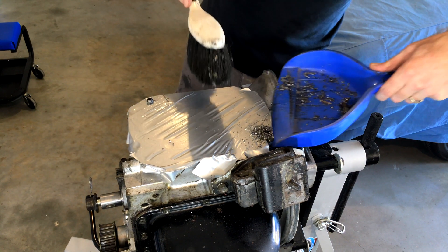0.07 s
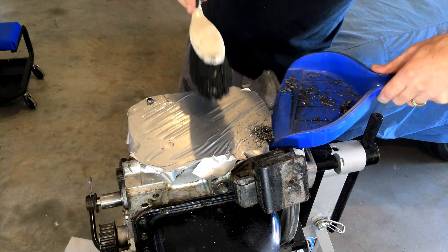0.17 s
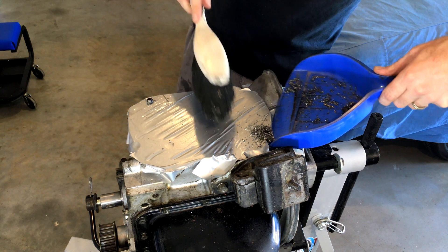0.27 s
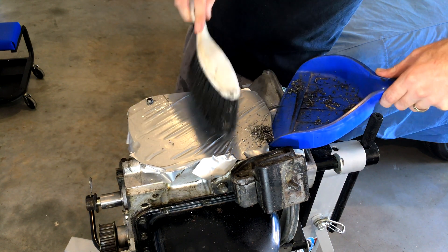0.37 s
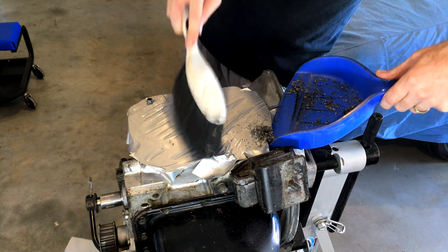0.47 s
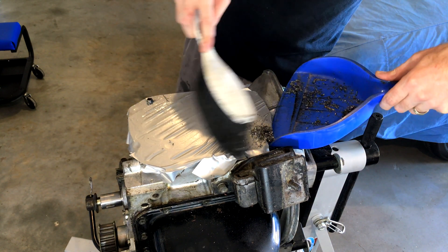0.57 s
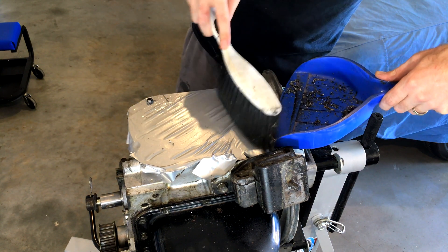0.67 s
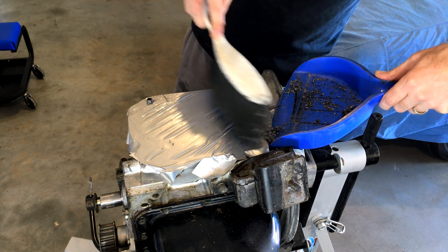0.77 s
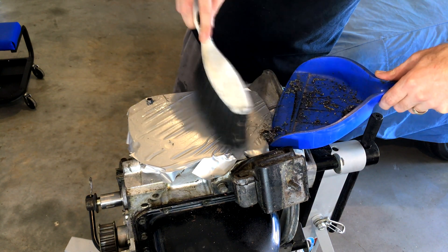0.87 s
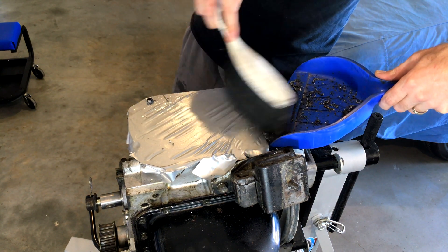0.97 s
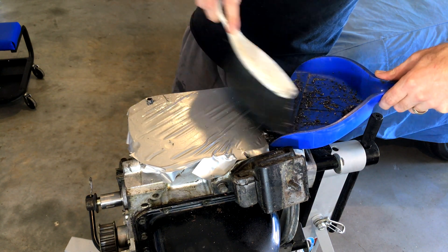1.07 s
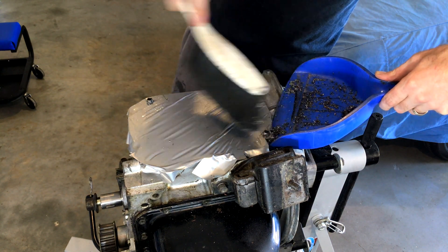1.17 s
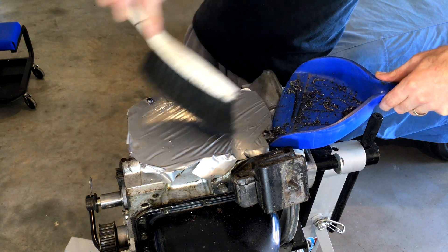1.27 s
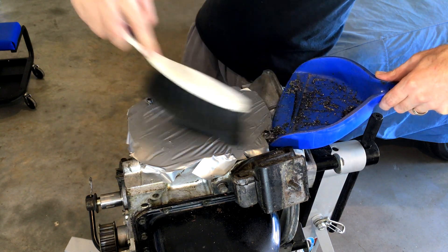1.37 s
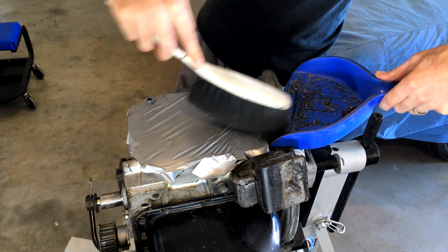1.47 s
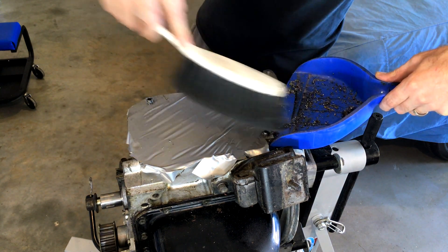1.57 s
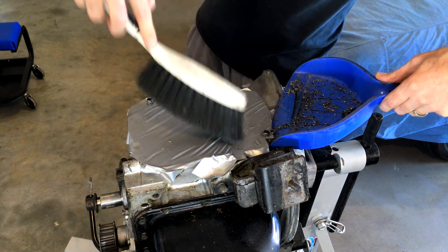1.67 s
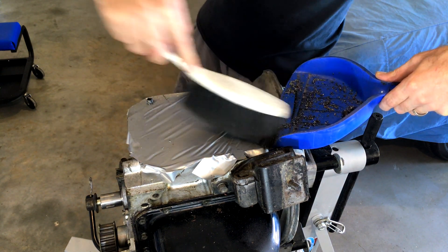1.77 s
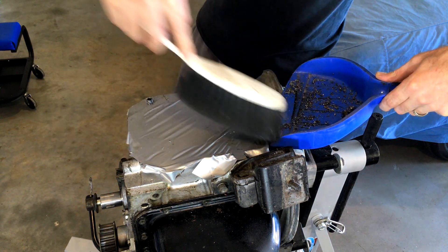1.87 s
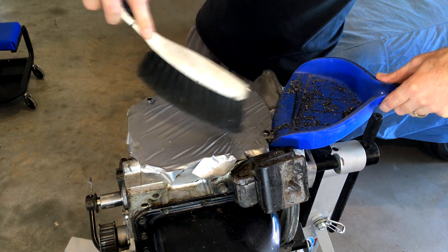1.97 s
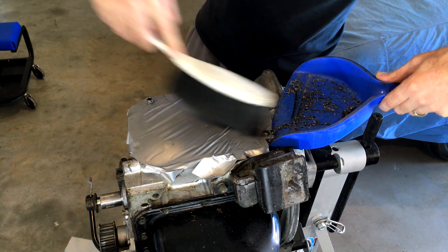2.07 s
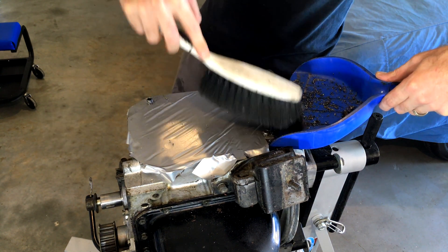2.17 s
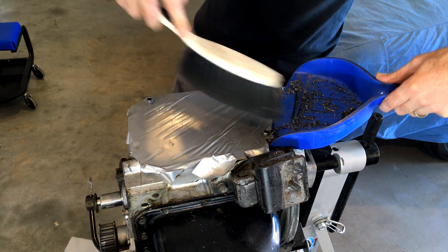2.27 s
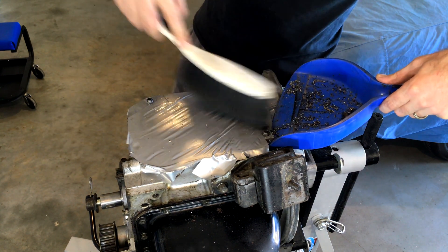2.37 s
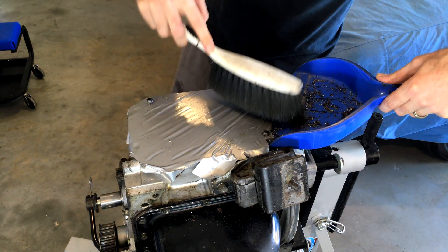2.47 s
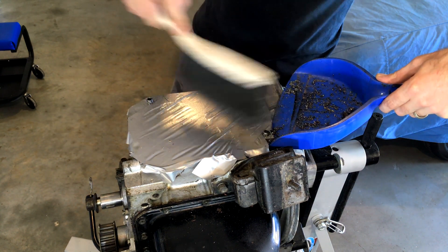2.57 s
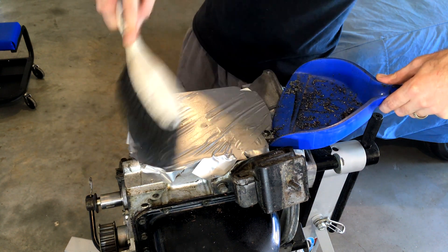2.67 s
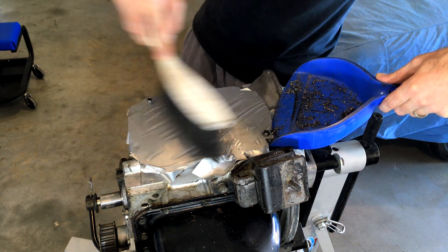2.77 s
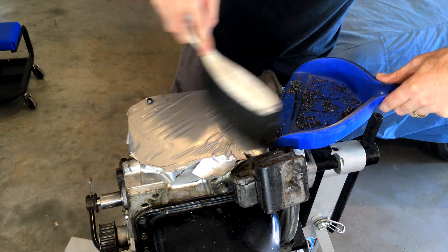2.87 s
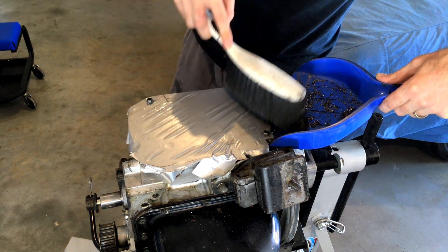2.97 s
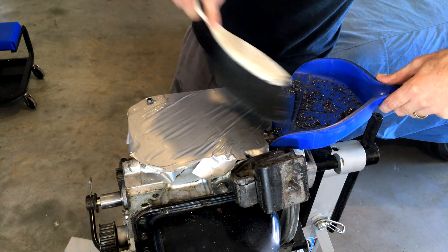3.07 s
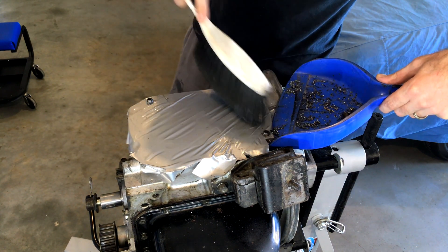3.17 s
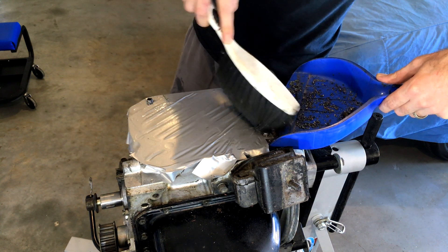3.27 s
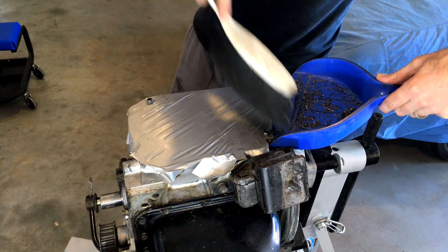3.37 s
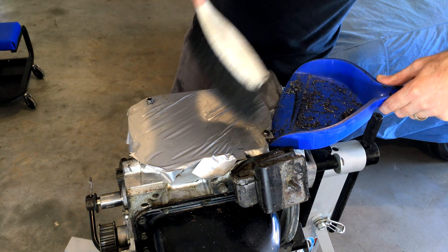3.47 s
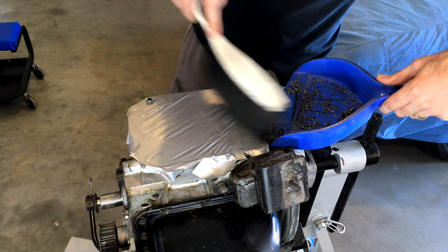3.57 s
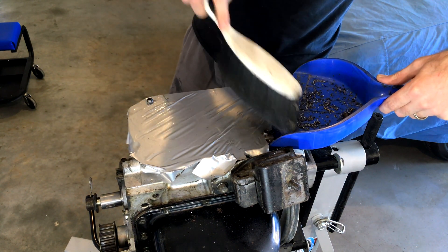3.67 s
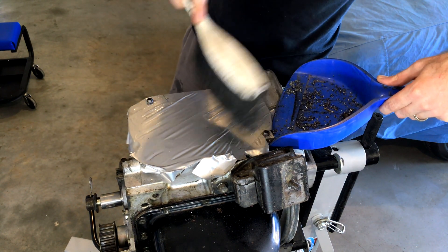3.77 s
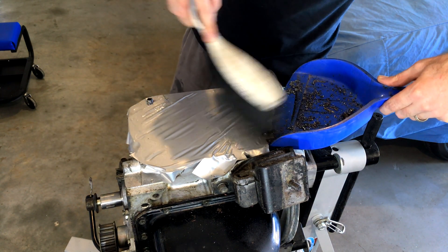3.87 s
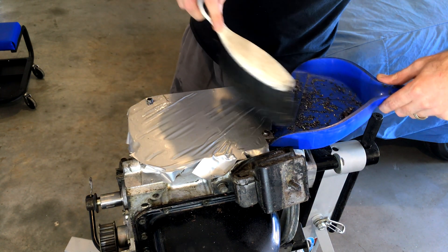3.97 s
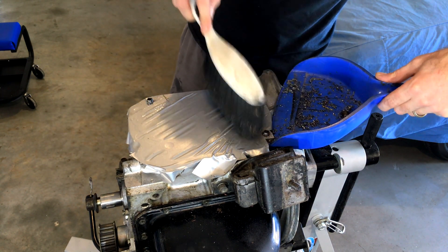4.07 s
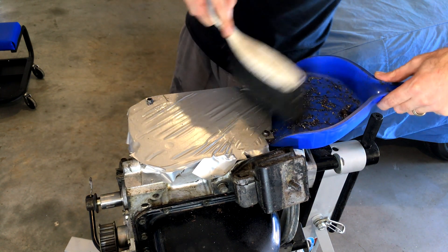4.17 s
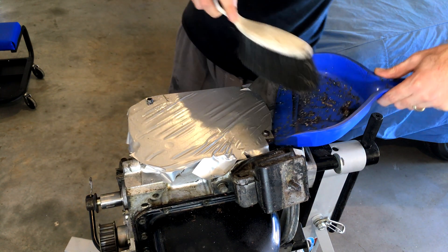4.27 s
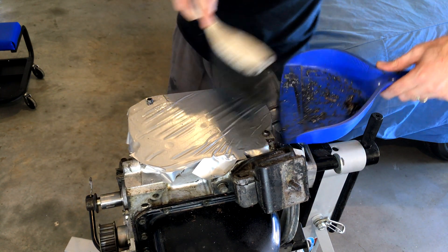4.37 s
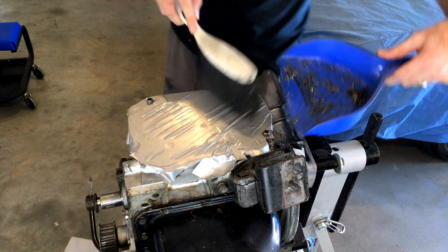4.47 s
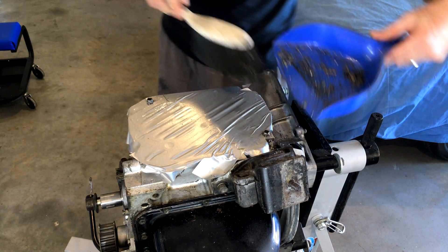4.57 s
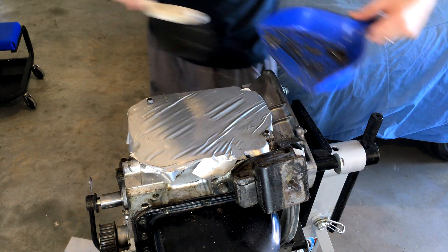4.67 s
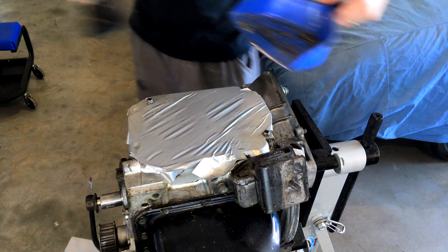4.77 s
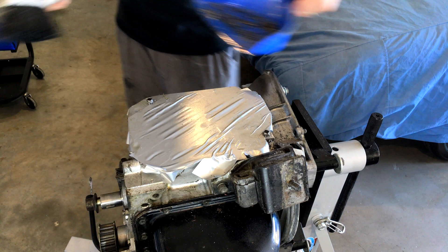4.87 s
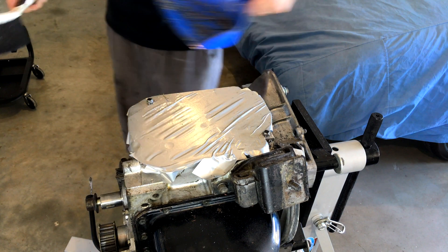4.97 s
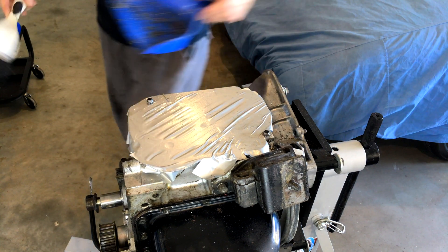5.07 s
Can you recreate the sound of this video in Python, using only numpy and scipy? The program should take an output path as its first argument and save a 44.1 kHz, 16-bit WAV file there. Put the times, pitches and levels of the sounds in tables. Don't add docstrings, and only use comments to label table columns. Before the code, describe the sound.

In a quiet garage, close to the microphone, a stiff hand brush makes about a dozen short strokes over a tape-covered engine part. Each lands with a small drum-like thump, then a dry, crackly scratch lasting a fraction of a second. Metal shavings tick sharply into a plastic dustpan, which rattles lightly. Strokes come roughly three per second, then thin out to faint brushing and a few last ticks.

```python
import sys
import numpy as np
from scipy import signal
from scipy.fft import rfft, irfft, next_fast_len
from scipy.io import wavfile
from scipy.ndimage import uniform_filter1d

SR = 44100
rng = np.random.default_rng(int(sys.argv[2]) if len(sys.argv) > 2 else 0)


def inscribe(sig):
    pcm = np.round(np.clip(np.atleast_2d(sig).T, -1, 1) * 32767)
    wavfile.write(sys.argv[1], SR, pcm.astype(np.int16))


def how_loud(loudness_db):
    steps = np.asarray(loudness_db, float) / 20
    return 10 ** steps


N = 226268

# freq_hz, density_db_per_hz
GARAGE_SPECTRUM = [(12, -8), (20, 7), (58, 3.5), (210, -6), (388, -11.5), (472, -8), (678, -16),
                   (780, -8.5), (976, -16.5), (1570, -16), (2530, -21.5), (5080, -22.5), (7110, -22.5),
                   (14700, -26.5), (16000, -25)]
# start_s, build_s, hold_s, level_db, ease_db_per_s
SHUFFLES = [
    (0, 0.0057, 0.1, -46.5, 103),
    (.488, 0.01, 0.08, -57, 91.5),
    (.88, .02, .02, -62, 86),
    (1.33, 0.029, 0.03, -62, 150),
    (1.75, 0.032, 0.021, -68, 200),
    (2.05, 0.071, 0.027, -68, 88),
    (2.37, 0.064, 0.023, -66, 71),
    (3.82, .02, 0.096, -65.5, 41),
    (4.19, 0.01, 0.013, -73, 200),
    (4.44, 0.016, .005, -61, 295),
]
# start_s, peak_db, pitch_hz
BUMPS = [
    (0.101, -41.5, 153),
    (0.575, -51, 145),
    (3.985, -45.5, 104),
    (4.023, -47, 95),
    (4.205, -51.5, 139),
    (4.456, -42.5, 127),
]
# start_s, build_s, hold_s, level_db, ease_db_per_s
WOBBLES = [
    (4.56, 0.058, 0.11, -69, 200),
    (4.95, 0.027, 0.089, -69, 200),
    (.24, 0.055, 0.1, -64.5, 250),
    (1.8, 0.019, 0.029, -59.5, 250),
    (2.19, 0.014, 0.013, -61, 300),
    (2.43, 0.014, 0.016, -61, 250),
    (3.62, 0.026, 0.029, -64.5, 200),
]
# start_s, build_s, hold_s, level_db, ease_db_per_s
SWISHES = [
    (0, 0.03, .01, -67, 26),
    (1.24, 0.062, .012, -73, 900),
    (4.52, 0.022, .05, -76.5, 18),
]
# start_s, build_s, hold_s, level_db, ease_db_per_s
TRICKLES = [
    (.75, .01, 0.092, -56, 150),
    (1.03, 0.023, .1, -63, 146),
    (1.52, .02, .1, -66.5, 150),
    (2.2, .01, 0.091, -61.5, 150),
    (2.53, .01, 0.077, -61, 200),
    (3.3, .02, 0.11, -61, 200),
    (3.66, .01, 0.053, -79, 148),
    (4.19, .01, 0.017, -71, 300),
    (4.7, .03, 0.38, -76, 100),
]
# start_s, peak_db, pitch_hz, low_part_db
CURLS = [(0.75, -31.5, 4600, -4), (0.795, -36.5, 4070, -1), (0.8171, -38, 4180, -2),
         (0.864, -34.5, 5130, -15), (0.995, -31.5, 3700, -12), (1.034, -43, 4910, -10),
         (1.2799, -48.5, 5150, 4), (1.575, -44, 4210, -8), (2.2599, -44, 3180, 1), (2.538, -46, 5000, 6),
         (3.3894, -48, 5000, -2), (3.406, -40, 4680, -7), (3.4494, -46, 3800, 5.5), (3.464, -53, 5530, 6),
         (3.9489, -28.5, 3900, -1), (3.9777, -30.5, 4800, -3), (4.0323, -47, 5260, 0)]
# start_s, peak_db, pitch_hz, low_part_db
CHIPS = [(1.1272, -46.5, 4160, 0), (1.402, -37, 3320, -16), (1.614, -46, 3230, -2),
         (2.1227, -27.5, 3880, -27), (2.2054, -39.5, 3680, -2), (2.461, -36.5, 3830, -10),
         (2.497, -46, 3850, -23), (2.556, -44.5, 3800, 1), (2.578, -49, 3800, -8), (2.589, -54, 3200, -10),
         (2.614, -52, 3030, 2.5), (2.6554, -40, 3900, 0), (3.1734, -40, 3120, -2), (3.4324, -57, 4570, -3),
         (3.675, -48, 4300, -11), (3.72, -56, 4250, -8), (4.206, -50, 4460, 8.5), (4.3593, -59, 2800, 19),
         (4.713, -51.5, 4560, 5), (4.7565, -45.5, 4660, -21), (4.978, -50, 4350, -18),
         (5.003, -42.5, 5150, -18), (5.018, -52, 4400, 6.5)]
# start_s, peak_db, pitch_hz
SPECKS = [(.4923, -36, 15000), (0.7497, -40, 12000), (0.773, -41, 4300), (.787, -40, 4260),
          (.826, -46, 12900), (.853, -40, 3800), (1.2795, -49, 12500), (1.322, -45, 12200),
          (1.515, -46, 13000), (1.713, -54, 9230), (1.713, -42, 5700), (1.7469, -45, 8410),
          (2.0697, -56, 8120), (2.2228, -43, 14200), (2.228, -45, 3500), (2.299, -51, 4000),
          (2.318, -55, 3300), (2.333, -55, 3900), (2.2591, -48, 14800), (2.3675, -47, 8130),
          (2.37, -29.5, 3340), (2.3955, -49, 8270), (2.6135, -50, 14100), (2.7204, -35.5, 8500),
          (2.72, -26.5, 4470), (3.1857, -47, 8940), (3.227, -41, 8390), (3.3577, -47, 14000),
          (3.4048, -45, 11100), (3.4231, -53, 12500), (3.425, -54, 3800), (3.462, -52, 12200),
          (3.548, -50, 3900), (3.5773, -46, 15000), (3.7785, -58, 4200), (3.9492, -33, 5550),
          (3.9509, -26, 4500), (3.9506, -28, 2630), (3.95, -39, 10000), (3.9502, -36, 14500),
          (3.9588, -40, 9000), (3.9588, -38, 13500), (3.978, -26, 4900), (4.4538, -41, 4200),
          (4.454, -47, 1500), (4.72, -52, 4300), (4.85, -52, 3800)]
# start_s, peak_db, pitch_hz, ring_t60_s
CATCHES = [(.028, -42, 865, 0.088), (.066, -42, 815, .03), (.0985, -33.5, 880, .012), (.666, -32, 620, .03),
           (.817, -42, 530, 0.019), (.935, -43, 610, 0.024), (.963, -33, 625, 0.023), (1.39, -37, 680, .04),
           (1.432, -33, 590, 0.041), (1.448, -28, 624, 0.036), (1.463, -32, 619, .05),
           (1.476, -31, 620, 0.047), (1.485, -28, 621, 0.041), (1.74, -31, 633, 0.02),
           (2.087, -35, 596, .025), (2.095, -27, 650, 0.026), (2.395, -28, 670, 0.027),
           (2.431, -41.5, 600, 0.023), (2.856, -32, 740, .03), (2.906, -31, 647, .03),
           (3.219, -33, 580, .04), (3.568, -42, 670, 0.027), (4.135, -33.5, 600, 0.027),
           (4.475, -38, 615, 0.024)]
# start_s, peak_db, pitch_hz, pan_knock_rel_db, ring_t60_s
THUMPS = [(0.098, -37, 720, -7, 0.037), (0.169, -45, 902, 9, 0.085), (0.494, -24, 633, -11, 0.025),
          (0.881, -25, 622, -2, 0.059), (1.333, -34, 620, -1.5, 0.033), (1.712, -45.5, 424, 4, 0.05),
          (2.048, -27, 874, -12, 0.019), (2.075, -27, 596, -22, 0.047), (2.366, -32.5, 594, -29, 0.1),
          (2.72, -27, 627, -14, 0.038), (3.192, -26, 630, -6.5, 0.039), (3.56, -38, 640, -22, 0.077),
          (3.844, -35.5, 818, 10, 0.041), (4.107, -29.5, 500, 0, 0.016), (4.454, -23.5, 653, -12, 0.029),
          (4.961, -46.5, 817, -23, 0.072), (5.003, -41, 746, -25, 0.04)]
# start_s, peak_db, pitch_hz, ring_t60_s
SINGS = [
    (1.385, -40.5, 651, 0.14),
    (1.43, -36, 630, 0.19),
    (1.47, -31, 622, 0.13),
    (2.93, -41, 2300, 0.13),
    (3.222, -46, 486, 0.31),
    (4.97, -53, 813, 0.15),
]
# freq_hz, width_hz, level_db
TAPE_MODES = [(331.5, 67, -12.5), (486, 51.4, -2.5), (573, 55, -4), (622, 34.4, -1), (713, 85, -2.5),
              (818, 69, -0.5), (992, 136, -7.5)]
# freq_hz, width_hz, level_db
PAN_MODES = [(1103, 180, 0), (1337, 59, 2.5), (1484, 100, 0.5), (1656, 74, 2), (1804, 206, -6),
             (2150, 90, -7), (2300, 60, -7.5)]
# freq_hz, density_db_per_hz
BRISTLE_SPECTRUM = [(1350, 1), (2300, -4), (2470, -7), (2840, -2), (3070, 0), (3310, 0.5), (4890, -1.5),
                    (5550, -2.5), (7000, -31), (9100, -71), (15400, -120)]
# freq_hz, density_db_per_hz
HISS_SPECTRUM = [(3710, 8), (6300, 2), (7140, -3.5), (7840, -4), (11500, -7), (12800, -5.5), (14300, -8),
                 (15400, -9), (16000, -34)]
# start_s, build_s, hold_s, bristle_db, fade_db_per_s
SWEEPS = [(0, 0.023, 0.098, -62.5, 87), (0.49, 0.075, 0.11, -48.5, 230), (0.741, 0.011, 0.0066, -48.5, 193),
          (0.826, 0.011, 0.022, -60, 250), (0.9, 0.024, 0.026, -51.5, 250),
          (0.962, 0.014, 0.0085, -52, 117), (1.324, 0.11, 0.025, -46.5, 139),
          (1.706, 0.003, 0.077, -47, 234), (1.809, 0.02, 0.037, -63.5, 300),
          (2.046, 0.077, 0.017, -46, 218), (2.368, 0.042, 0.011, -45.5, 216),
          (2.716, 0.061, 0.063, -42, 200), (2.855, 0.025, 0.05, -49, 300), (3.182, 0.06, 0.013, -47.5, 192),
          (3.383, 0.011, 0.018, -65, 207), (3.553, 0.033, 0.015, -50, 222),
          (3.843, 0.0067, 0.023, -50.5, 254), (3.952, 0.0045, .005, -50, 205),
          (4.101, 0.0039, 0.019, -49.5, 307), (4.184, 0.0066, 0.0044, -74, 254),
          (4.451, 0.0019, 0.003, -45, 700), (4.599, 0.08, 0.084, -65.5, 100),
          (4.819, 0.034, 0.02, -57, 164), (4.969, 0.022, 0.077, -73, 150)]
# pan_db, hiss_rel_db, then tape_tilt, bristle_tilt, hiss_tilt in db_per_octave
PLACES = [(7, 0, 6.5, -13, 1), (3.5, -8.5, -2.5, 0, 1.5), (2.5, -6, -6.5, 7, 6), (0, -10, -1, 3, 0),
          (6.5, -7, -4.5, -3, -1), (3, -10, -6.5, 7, 2), (-2, -7, -1, 3, 3.5), (-2.5, -8, -11.5, -0.5, 4),
          (3.5, 2.5, -6, 13, 1), (-3, -8.5, -1.5, 3.5, 1), (-5.5, -10.5, 3, -2.5, -0.5), (-3, -8, -2, 7, 6),
          (0, -9.5, -1.8, 3, 2), (-2.5, -7, -5.5, -4.5, 3), (3.5, -3, 7, -4, 4), (2.5, -6, -2.5, 3.5, 0),
          (4, -7, -0.5, 7, 8), (-6, -4, -3, 0, 3), (-2, -9.5, -3, -0.5, 1.5), (13, -12, -5, 4, 3),
          (-1.5, -31, -8, -1, -8), (-2.5, -21, -11, 2, 5), (-8, -9, -15, -1.2, 0), (-12, -18, 7.5, 13, 9)]
# dip_hz, dip_drift_hz_per_s, dip_db, patch_hz, patch_db
SHADES = [(10300, 0, -6, 13800, 4), (13800, 2000, -4, 12200, 2.5), (14200, 0, -6, 12500, 1),
          (14200, 0, -5, 12500, 4), (14300, 0, -2, 12500, 3), (14000, 0, -4, 12700, 7),
          (13500, -5000, -3, 14300, -1), (12600, 0, -4, 9000, 1.5), (9700, 0, -9, 14500, 0),
          (11900, -15000, -1, 7800, 3), (10900, 0, -3, 8500, 3.5), (13300, -1500, -9, 14000, 0),
          (12800, -1500, -10, 14200, 4), (13500, 0, -11, 15000, 6), (9250, 0, -9, 12000, 5),
          (13800, 0, -5, 15000, 6), (13500, 0, -7, 10300, 2), (11000, 0, -2, 14000, 1.5),
          (13000, 0, -7, 8600, 1), (13000, 0, -1.5, 9000, 4), (13000, 0, -6, 9800, 3),
          (12000, 0, 1, 8000, 5), (10000, 0, -3, 12000, 0), (13000, 0, -1.5, 8000, -5)]
# start_s, build_s, hold_s, drum_db, ease_db_per_s
PRESSES = [(0, 0.00091, 0.03, -48, 46), (.489, 0.0025, 0.003, -30.5, 602), (.54, 0.11, 0.027, -41, 400),
           (.81, 0.0051, 0.0042, -52.5, 800), (.881, 0.0014, 0.0022, -30.5, 700),
           (.9, 0.049, .015, -38, 700), (1.265, 0.055, 0.005, -51.5, 497),
           (1.328, 0.066, 0.078, -40.5, 600), (1.715, .003, .13, -58, 280),
           (1.73, 0.0049, 0.0039, -45.5, 504), (2.047, 0.051, 0.0093, -37.5, 652),
           (2.367, 0.0013, 0.015, -36, 700), (2.425, 0.008, .003, -55.5, 200),
           (2.718, 0.0013, 0.0071, -34.5, 708), (2.76, 0.03, .003, -41.5, 300),
           (2.83, 0.066, 0.032, -44.5, 447), (3.189, 0.0044, 0.031, -40.5, 800),
           (3.548, 0.012, 0.0081, -44, 600), (3.844, 0.0027, 0.011, -38.5, 420),
           (3.96, 0.0086, 0.033, -55, 300), (4.103, 0.0018, 0.0027, -35.5, 397),
           (4.451, 0.0023, 0.0039, -34.5, 745), (4.55, 0.12, 0.093, -59, 200),
           (4.955, 0.0094, 0.047, -60.5, 151)]
# freq_hz, width_hz, depth_0_to_1
HOUSING_DIPS = [(2720, 170, 0.02), (6600, 1770, 0.44)]

ECHO_DELAY_S, ECHO_DB, ECHO_LOW_HZ = 0.0094, -26.5, 2470
ROOM_T60_S, ROOM_DB = 0.17, -21
GARAGE_DB, STANDING_DB = -61, -72
WOBBLE_HZ, WOBBLE_WIDTH_HZ = 312, 97
CURL_TOP_DB, CHIP_TOP_DB = -8.5, -22
SWEEP_START_DB, SWEEP_TRAIL_DB, SWEEP_TRAIL_DB_S = -4.5, -21, 103
PRESS_START_DB, PRESS_TRAIL_DB, PRESS_TRAIL_DB_S = -5, -14, 130
SWEEP_DRUM_DB = -9
PRESS_PAN_DB, PRESS_BRISTLE_DB, PRESS_HISS_DB = -10.5, -17.5, -25.5
SHADE_WIDTH_HZ = 750
RIM_DIP_HZ, RIM_DIP_WIDTH_HZ, RIM_DIP_DB = 7300, 380, -1.5
TOP_HZ = 15800


def unit(x):
    return x / np.sqrt(np.mean(x ** 2))


def band(x, hz, width_hz):
    return signal.lfilter(*signal.iirpeak(hz, hz / width_hz, fs=SR), x)


def band_twice(x, hz, width_hz):
    return band(band(x, hz, width_hz), hz, width_hz)


def modes(x, table):
    return sum((-1) ** k * how_loud(db) * band(x, hz, width_hz) for k, (hz, width_hz, db) in enumerate(table))


def colour(x, table):
    hz, db = np.transpose(table)
    size = next_fast_len(len(x))
    log_f = np.log(np.arange(size // 2 + 1) * SR / size + 1)
    points_hz = np.r_[hz[0] / 2, hz, hz[-1] * 2]
    points_db = np.r_[db[0] - 60, db, db[-1] - 60]
    gain_db = np.interp(log_f, np.log(points_hz), points_db)
    return irfft(rfft(x, size) * how_loud(gain_db), size)[:len(x)]


def walk(rate_hz):
    hold = int(SR / rate_hz)
    levels = np.repeat(rng.standard_normal(N // hold + 1), hold)
    return unit(uniform_filter1d(levels, hold)[:N])


def slips(rate_hz, spread_db, clump):
    chance = rng.random((3, N))
    size = how_loud(-spread_db * np.log(1 - chance[1])) * np.sign(chance[2] - 0.5)
    return (chance[0] < rate_hz / SR) * size * clump


def ring(start_s, hz, t60_s, rise_s):
    t = np.arange(int(0.3 * SR)) / SR
    shape = (1 - np.exp(-t / rise_s)) * np.exp(-np.log(1000) * t / t60_s)
    return int(start_s * SR), shape / shape.max() * np.sin(2 * np.pi * hz * t)


def add(out, start, sound):
    out[start:start + len(sound)] += sound[:len(out) - start]


def efforts(table, start_db, trail_db=-60, trail_db_s=100):
    out = np.zeros((len(table), N + SR))
    t = np.arange(int(0.8 * SR)) / SR
    for row, (start_s, build_s, hold_s, db, fall_db_s) in zip(out, table):
        after_s = np.maximum(t - build_s - hold_s, 0)
        rising_db = start_db * np.clip(1 - t / (build_s + 1e-4), 0, 1)
        falling_db = np.maximum(-fall_db_s * after_s, trail_db - trail_db_s * after_s)
        add(row, int(start_s * SR), how_loud(db + rising_db + falling_db))
    return out[:, :N]


def floor_echo(x, db, low_hz):
    bright = signal.lfilter(*signal.butter(2, low_hz, "high", fs=SR), x)
    return how_loud(db) * np.r_[np.zeros(int(ECHO_DELAY_S * SR)), bright][:N]


def room(x):
    t = np.arange(int(0.5 * SR)) / SR
    decay = np.exp(-np.log(1000) * t / ROOM_T60_S) * (t > ECHO_DELAY_S)
    tail = rng.standard_normal(len(t)) * decay
    tail = signal.lfilter(*signal.butter(1, 6000, fs=SR), tail)
    diffuse = signal.fftconvolve(x, tail / np.linalg.norm(tail))[:N]
    return x + floor_echo(x, ECHO_DB, ECHO_LOW_HZ) + how_loud(ROOM_DB) * diffuse


def garage():
    breath = how_loud(0.5 * walk(3))
    return unit(colour(rng.standard_normal(N), GARAGE_SPECTRUM)) * how_loud(GARAGE_DB - 2.5) * breath


def shuffle():
    moves = how_loud(STANDING_DB) + efforts(SHUFFLES, 4).sum(axis=0)
    rumble = band(band(rng.standard_normal(N), 105, 320), 123, 440)
    out = unit(rumble) * moves * how_loud(1.04 * walk(21.1) - 4.5)
    for start_s, db, hz in BUMPS:
        start, swing = ring(start_s, hz, t60_s=0.042, rise_s=0.0065)
        add(out, start, how_loud(db) * swing)
    return out


def wobble():
    hum = band_twice(rng.standard_normal(N), WOBBLE_HZ, WOBBLE_WIDTH_HZ)
    return unit(hum) * efforts(WOBBLES, 4).sum(axis=0)


def swish():
    hiss = unit(band_twice(rng.standard_normal(N), 5950, 1700))
    return hiss * efforts(SWISHES, -4).sum(axis=0) * how_loud(6.5)


def trickle():
    grains = slips(400, 1.5, 1) * efforts(TRICKLES, -1).sum(axis=0)
    grain_decay = np.exp(-np.arange(200) / SR / 0.0009)
    fizz = signal.fftconvolve(abs(grains), grain_decay)[:N] * rng.standard_normal(N)
    return how_loud(5.5) * band_twice(fizz, 4700, 3000) + how_loud(14.0) * band_twice(fizz, 1400, 800)


def ticks():
    out = np.zeros(N)
    t = np.arange(500) / SR
    fade = (1 - np.exp(-t / 0.00015)) * np.exp(-t / 0.0012)
    for table, top_db in [(CURLS, CURL_TOP_DB), (CHIPS, CHIP_TOP_DB)]:
        for start_s, db, hz, low_db in table:
            noise = rng.standard_normal(500)
            crack = band(noise * fade, hz, 730)
            snap = band(noise * fade ** 2, 3100, 4100)
            top = band(band(noise, 10000, 11000), 11000, 10400) * fade
            knock = band(band(noise * fade, 1240, 840), 1620, 730)
            for part, part_db in [(crack, -1.5), (snap, -18), (top, top_db + 2.5), (knock, low_db - 3.5)]:
                add(out, int(start_s * SR), how_loud(db + part_db) * part / abs(part).max())
    return out


def specks():
    out = np.zeros(N)
    decay = np.exp(-np.arange(300) / SR / 0.00081)
    for start_s, db, hz in SPECKS:
        click = band_twice(rng.standard_normal(300) * decay, hz, 2900)
        add(out, int(start_s * SR), how_loud(db - 2.0) * click / abs(click).max())
    return out


def catches():
    out = np.zeros(N)
    for start_s, db, hz, t60_s in CATCHES:
        for ratio, part_db in [(1, -6), (1.33, -11.5)]:
            start, swing = ring(start_s, hz * ratio, t60_s, rise_s=0.0012)
            add(out, start, how_loud(db + part_db) * swing)
    return out


def thumps():
    out = np.zeros(N)
    splat_decay = np.exp(-np.arange(2000) / SR / 0.0043)
    for start_s, db, hz, pan_db, t60_s in THUMPS:
        for ratio, part_db in [(1, -5.0), (1.31, -12.0), (0.78, -15.5)]:
            start, swing = ring(start_s, hz * ratio, t60_s, rise_s=0.00079)
            add(out, start, how_loud(db + part_db) * swing)
        splat = modes(rng.standard_normal(2000) * splat_decay, PAN_MODES)
        add(out, start, how_loud(db + pan_db - 3.5) * splat / abs(splat).max())
    return out


def sings():
    out = np.zeros(N)
    for start_s, db, hz, t60_s in SINGS:
        start, swing = ring(start_s, hz, t60_s, rise_s=0.00034)
        waver = np.roll(walk(hz / 15), -start)[:len(swing)]
        add(out, start, how_loud(db) * swing * (600 / hz + waver / 2))
    return out


def running_sweep():
    return np.searchsorted(np.transpose(SWEEPS)[0], np.arange(N) / SR, "right") - 1


def stroke_controls():
    slide = efforts(SWEEPS, SWEEP_START_DB, SWEEP_TRAIL_DB, SWEEP_TRAIL_DB_S) ** 2
    press = (efforts(PRESSES, PRESS_START_DB, PRESS_TRAIL_DB, PRESS_TRAIL_DB_S) ** 2).sum(axis=0)
    pan_db, hiss_db, *tilts = np.transpose(PLACES)
    power = [press + how_loud(2 * SWEEP_DRUM_DB) * slide.sum(axis=0),
             how_loud(2 * pan_db) @ slide + how_loud(2 * PRESS_PAN_DB) * press,
             slide.sum(axis=0) + how_loud(2 * PRESS_BRISTLE_DB) * press,
             how_loud(2 * hiss_db) @ slide + how_loud(2 * PRESS_HISS_DB) * press]
    gains = uniform_filter1d(np.sqrt(power), size=60, axis=1)
    return gains, np.array(tilts)[:, running_sweep()]


def bell(hz, centre_hz, width_hz):
    return np.exp(-0.5 * ((hz - centre_hz) / width_hz) ** 2)


def shade(hz):
    sweep = running_sweep()
    dip_hz, drift_hz_s, dip_db, patch_hz, patch_db = np.transpose(SHADES)[:, sweep]
    since_s = np.minimum(np.arange(N) / SR - np.transpose(SWEEPS)[0][sweep], 0.2)
    dip = dip_db * bell(hz, dip_hz + drift_hz_s * since_s, SHADE_WIDTH_HZ)
    patch = patch_db * bell(hz, patch_hz, SHADE_WIDTH_HZ)
    return dip + patch + RIM_DIP_DB * bell(hz, RIM_DIP_HZ, RIM_DIP_WIDTH_HZ)


def patchy(x, lo_hz, hi_hz, tilt, patchy_db, count, shading=lambda hz: 0):
    relative_width = 1.05 * ((hi_hz / lo_hz) ** (1 / (count - 1)) - 1)
    middle_hz = np.sqrt(lo_hz * hi_hz)
    out = np.zeros(N)
    for k, hz in enumerate(np.geomspace(lo_hz, hi_hz, count)):
        level_db = tilt * np.log2(hz / middle_hz) + patchy_db * walk(12) + shading(hz)
        out += (-1) ** k * band_twice(x, hz, hz * relative_width) * how_loud(level_db)
    return out


def brush():
    (drum_gain, pan_gain, tip_gain, hiss_gain), (tape_tilt, tip_tilt, hiss_tilt) = stroke_controls()
    clump = how_loud(1.3 * walk(70))
    heavy = slips(2500, 1.8, clump * how_loud(0.8 * walk(40)))
    medium = slips(3500, 1.1, clump * how_loud(2.43 * walk(60)))

    drum = np.zeros(N)
    for k, (hz, width_hz, db) in enumerate(TAPE_MODES):
        push_db = db + tape_tilt * np.log2(hz / 600) + 1.6 * walk(20)
        drum += (-1) ** k * band(heavy * drum_gain * how_loud(push_db), hz, width_hz)
    drum *= how_loud(-3.5) / np.std(modes(heavy, TAPE_MODES))
    rattle = modes(medium * pan_gain, PAN_MODES) / np.std(modes(medium, PAN_MODES)) * how_loud(-1.5)

    clicks = colour(slips(7000, 2.1, clump), BRISTLE_SPECTRUM)
    clicks = unit(patchy(clicks, 2160, 7440, tip_tilt, 0.98, count=7)) * tip_gain * how_loud(-2.0)
    chirps = sum(band(slips(40, 2.2, clump), hz, 350) for hz in np.geomspace(3000, 5600, num=8))
    chirps = unit(chirps) * tip_gain * how_loud(-7.5)
    hiss = colour(slips(9000, 1.96, clump), HISS_SPECTRUM)
    hiss = unit(patchy(hiss, 5900, 15500, hiss_tilt, 0.55, count=18, shading=shade)) * hiss_gain * how_loud(0.5)
    return drum + rattle + clicks + chirps + hiss


def scene():
    shavings = ticks() + trickle()
    shavings = shavings + floor_echo(shavings, -7, 6000)
    strokes = brush() + thumps() + sings() + catches() + specks()
    return (room(strokes + shavings + swish()) + shuffle() + garage() + wobble())[None]


def top_cut(x):
    return signal.sosfilt(signal.butter(12, 16720, fs=SR, output="sos"), x)


def record(dry):
    for hz, width_hz, depth in HOUSING_DIPS:
        dry = dry - depth * band(dry, hz, width_hz)
    low_pass = signal.ellip(8, 0.2, 30, TOP_HZ, fs=SR, output="sos")
    mix = signal.sosfilt(low_pass, dry)
    return top_cut(mix)


dry = scene()
out = record(dry)
inscribe(out)
```